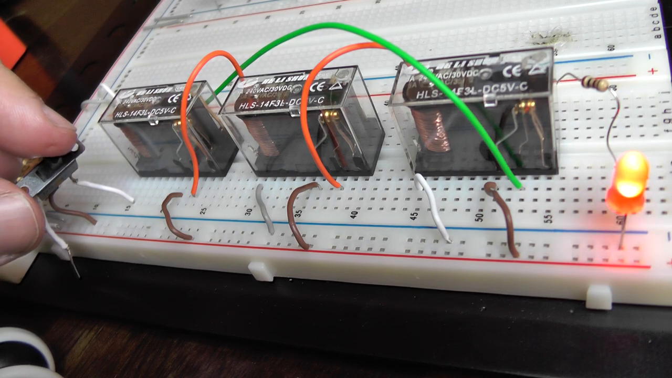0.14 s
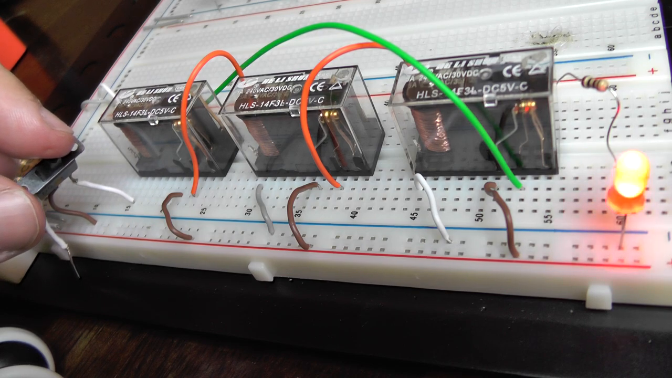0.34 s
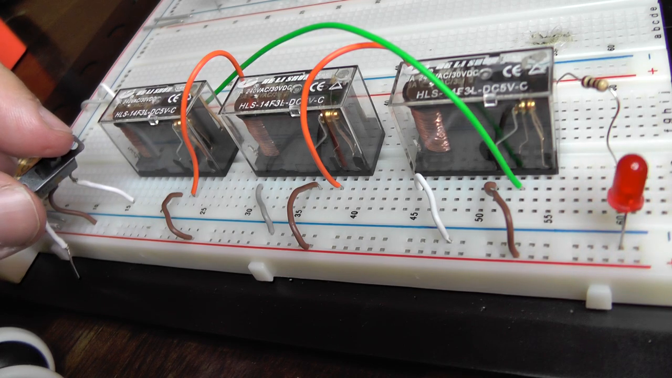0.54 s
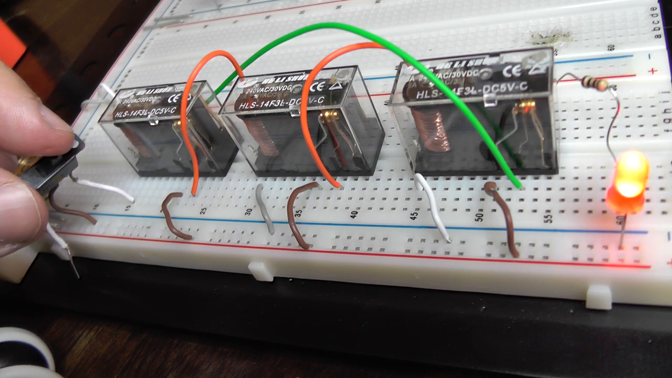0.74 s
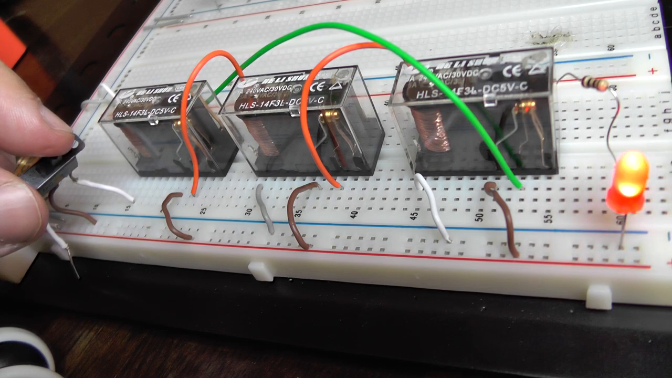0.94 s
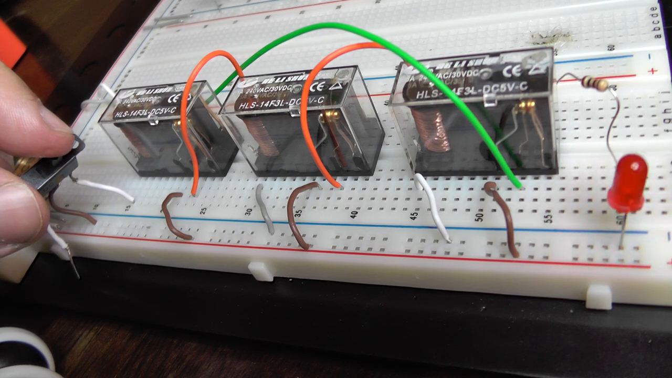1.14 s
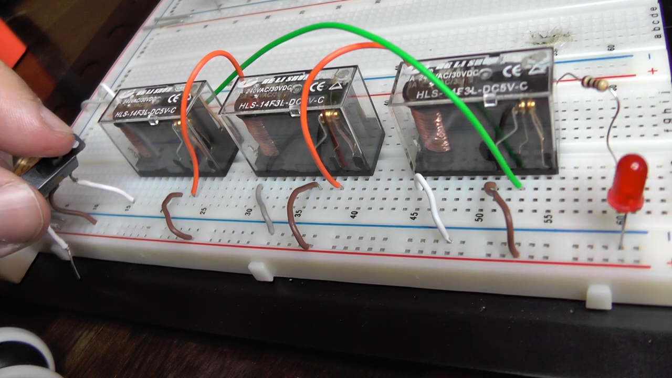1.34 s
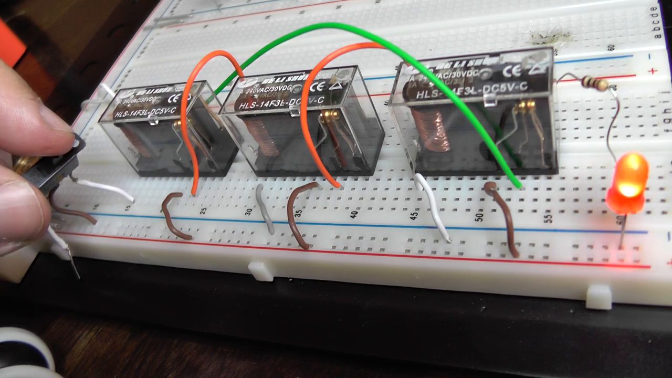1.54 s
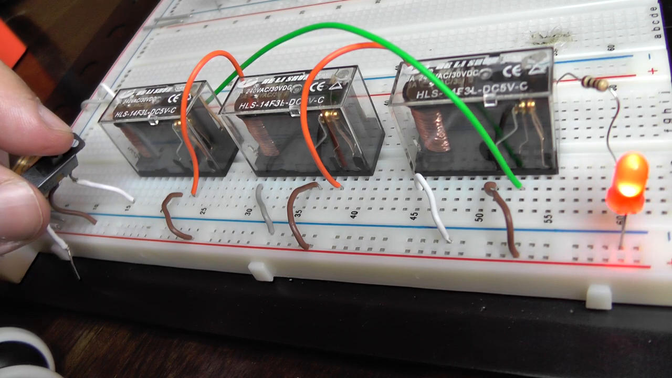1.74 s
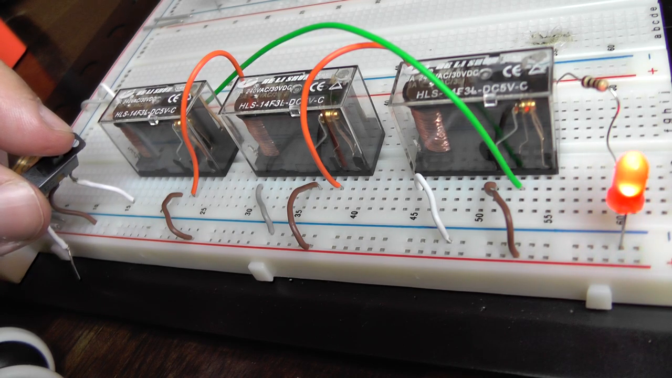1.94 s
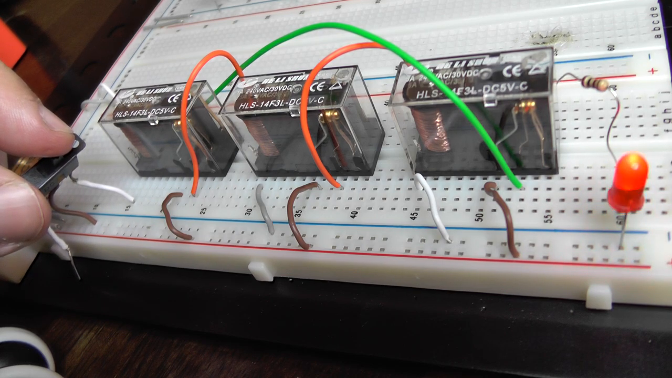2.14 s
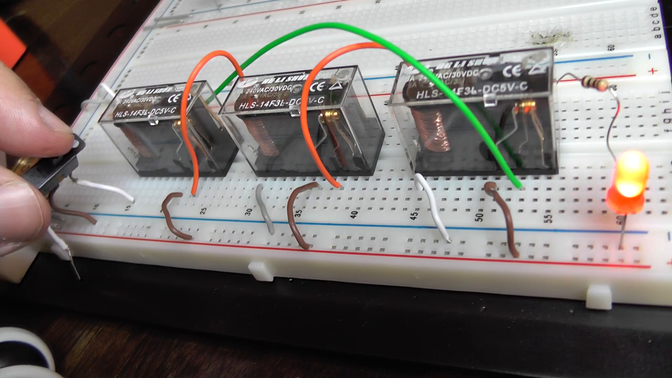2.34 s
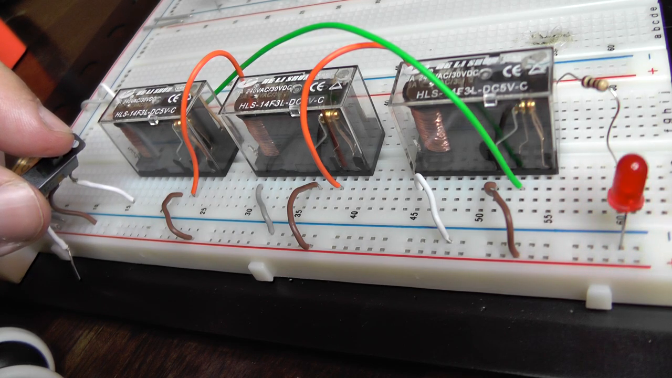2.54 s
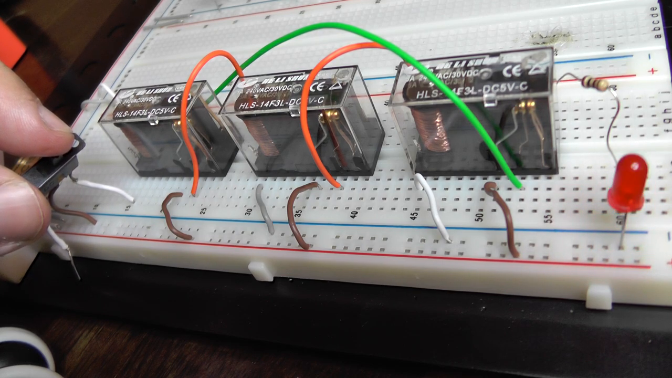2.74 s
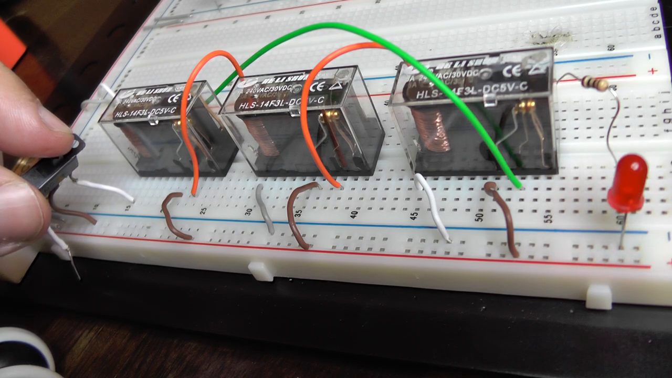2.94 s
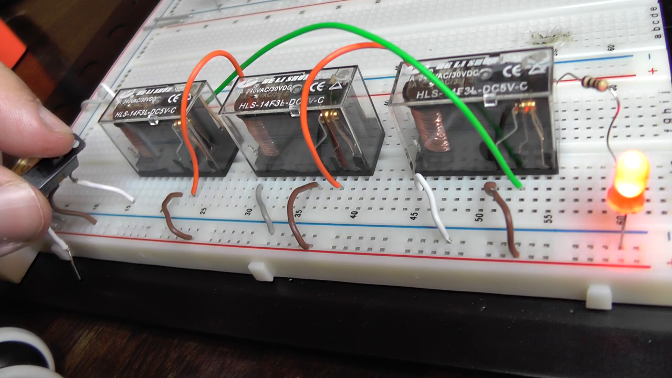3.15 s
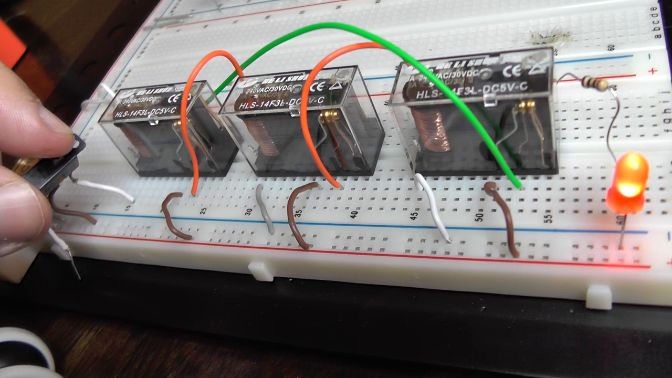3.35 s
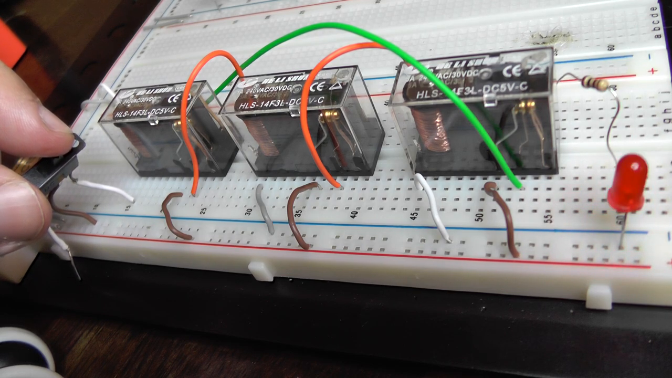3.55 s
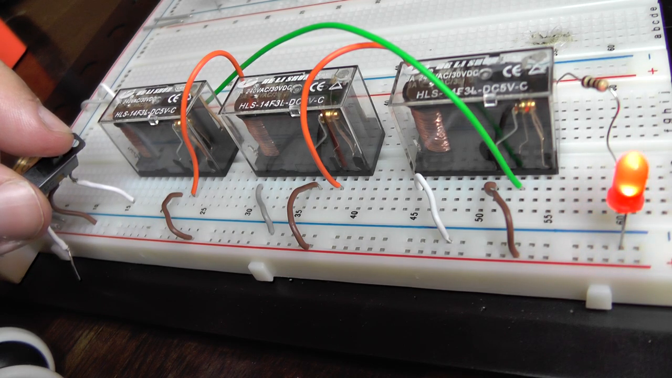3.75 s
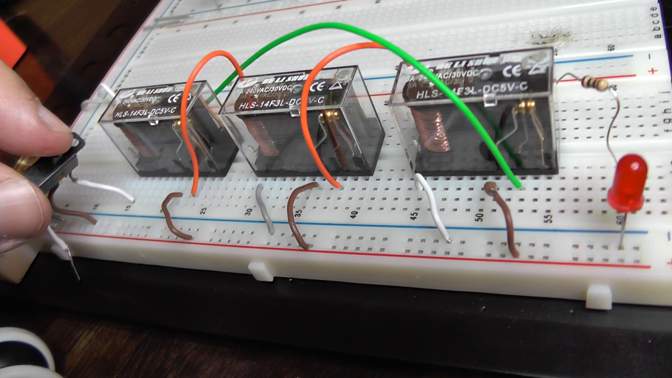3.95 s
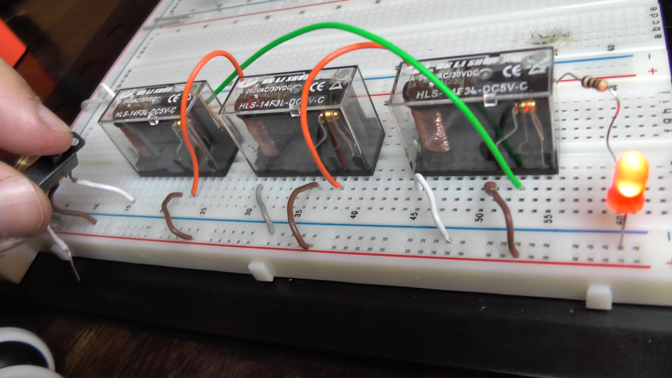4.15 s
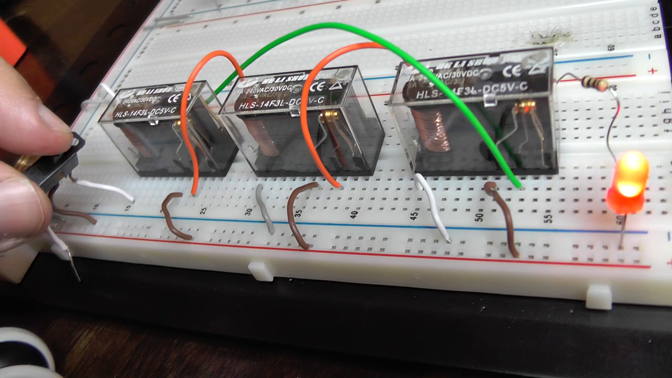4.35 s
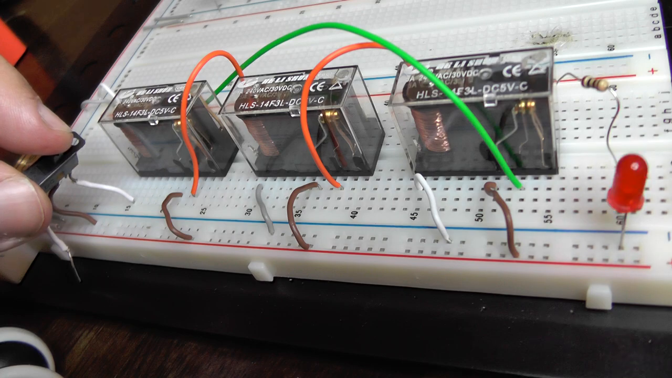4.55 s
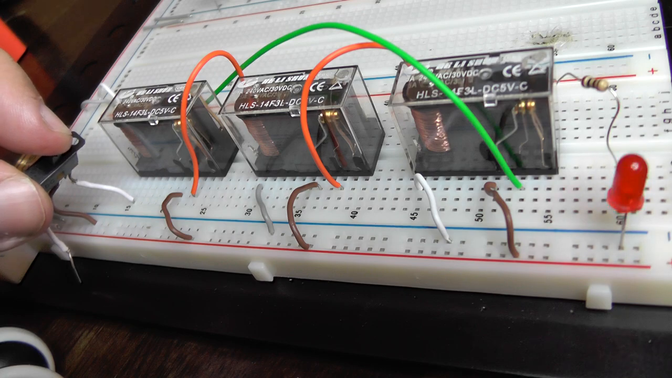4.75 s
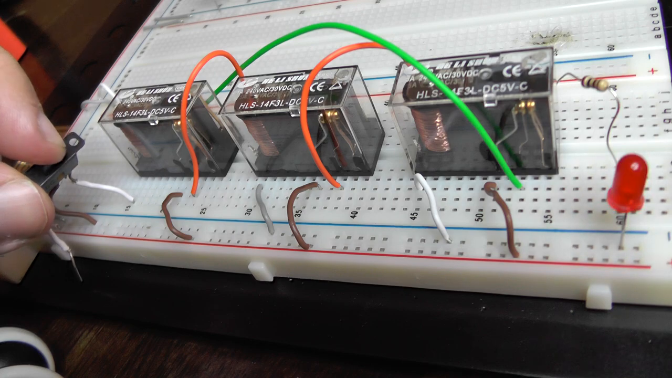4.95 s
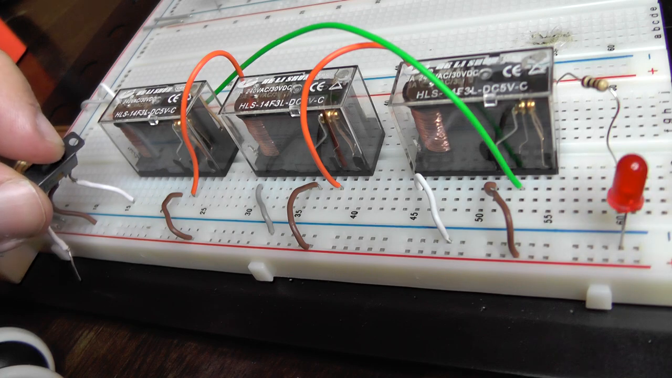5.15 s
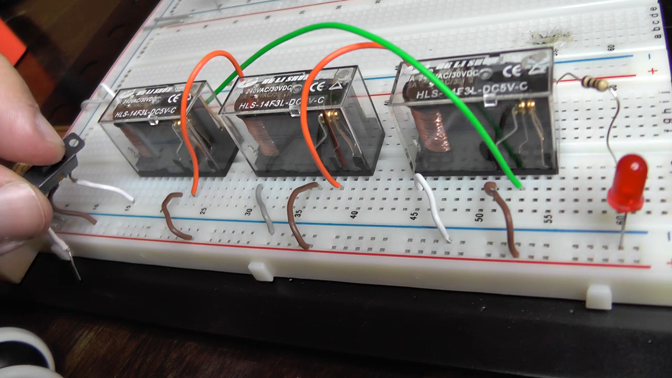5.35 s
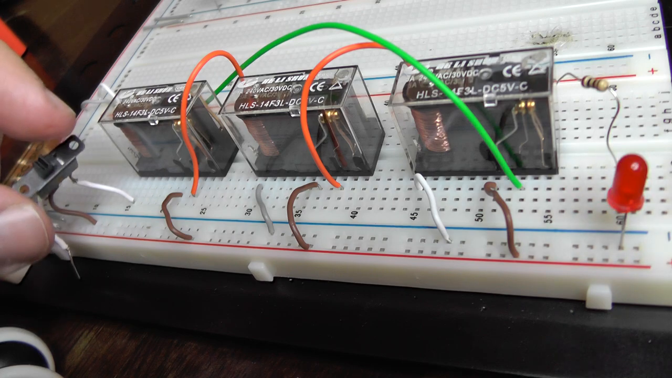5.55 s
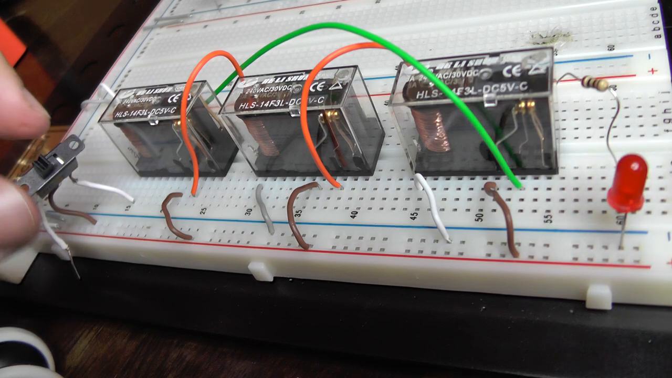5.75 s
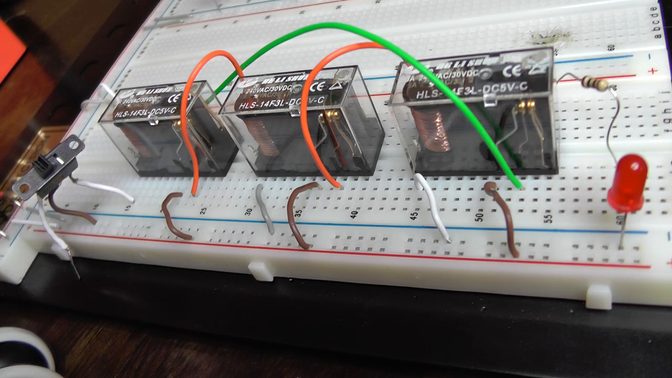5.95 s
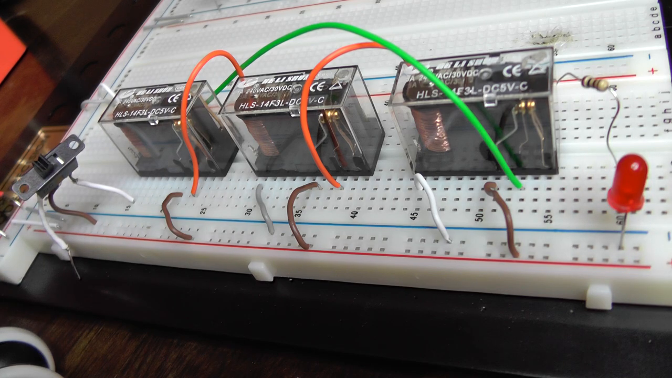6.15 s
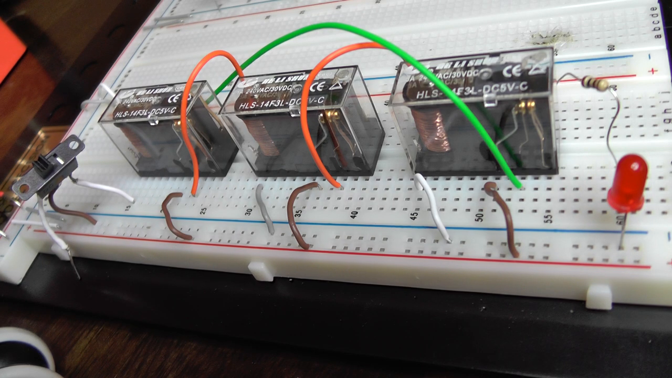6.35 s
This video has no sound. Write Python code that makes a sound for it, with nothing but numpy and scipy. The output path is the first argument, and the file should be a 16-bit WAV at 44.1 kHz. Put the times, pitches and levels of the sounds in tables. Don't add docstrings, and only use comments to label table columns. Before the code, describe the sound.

Three tiny relays chatter in a fast, bright, rattling buzz close up, stumbling slightly, then stop dead, leaving rising room hiss and one faint tap.

```python
import sys
import numpy as np
from scipy import signal
from scipy.fft import rfft, irfft, next_fast_len
from scipy.io import wavfile
from scipy.ndimage import uniform_filter1d

SR = 44100
rng = np.random.default_rng(int(sys.argv[2]) if len(sys.argv) > 2 else 0)


def log_audio(samples):
    frames = np.atleast_2d(samples).T
    limited = np.clip(frames, -1, 1)
    pcm = np.round(limited * 32767).astype(np.int16)
    wavfile.write(sys.argv[1], SR, pcm)


def ratio_of_db(decibels):
    return 10 ** (np.asarray(decibels, float) / 20)


N = 286650

ROUND_MS = 41.3


def read(points, hz):
    f, value = np.transpose(points)
    return np.interp(np.log(hz + 1), np.log(f + 1), value)


def coloured(x, points):
    size = next_fast_len(x.shape[-1])
    gain = ratio_of_db(read(points, np.fft.rfftfreq(size, 1 / SR)))
    return irfft(rfft(x, size) * gain, size)[..., :x.shape[-1]]


def ring(modes, size, rise):
    t = np.arange(size) / SR
    tones = np.zeros(size)
    for k, (hz, db, t60) in enumerate(modes):
        tones += (-1) ** k * ratio_of_db(db - 60 * t / t60) * np.sin(2 * np.pi * hz * t)
    return tones * (1 - np.exp(-t / rise))


def clicks(s, size):
    return np.bincount(np.clip(np.round(s * SR).astype(int), 0, N - 1), size, N)


def hum():
    # f/Hz, level/dB per Hz
    tone = [(18, -55), (30, -30), (60, -12), (261, -5), (674, -12.5), (950, -19), (1650, -19.5),
            (2270, -28), (3370, -25), (4270, -27.5), (11000, -39), (16400, -39)]
    # f/Hz, level/dB
    spread = [(60, -19), (180, -22), (550, -15), (1650, -21), (4970, -24), (15000, -17)]
    hz, t, z = signal.stft(rng.standard_normal((2, N)), SR, nperseg=1024)
    patches = uniform_filter1d(rng.standard_normal(z.shape[1:]), 8, 0)
    patches = uniform_filter1d(patches, 3, 1)
    patches = patches / np.sqrt(np.mean(patches ** 2) + 1e-20)
    z = z * ratio_of_db(read(tone, hz)[:, None] + 0.5 * patches * (hz < 2000)[:, None])
    mid, side = signal.istft(z, SR, nperseg=1024)[1][:, :N]
    return ratio_of_db(-51.5) / np.std(mid) * np.array([mid, coloured(side, spread)])


def far_tap():
    # t/s, level/dB, f/Hz, t60/s
    knock = [
        (6.061, -39, 680, 0.014),
    ]
    (s, db, hz, t60), = knock
    overtones = [(1, -5), (1.6, -2), (2.2, -5), (3.1, -8), (4.3, -8)]  # ratio, level/dB
    modes = [(ratio * hz, db + level_db, t60) for ratio, level_db in overtones]
    hit = clicks(np.array([s + .0015]), [1.])
    return signal.oaconvolve(hit, ring(modes, size=800, rise=.0003))[:N]


def room(x):
    # f/Hz, t60/s
    decay = [(500, 1), (1500, 0.47), (2600, 0.9), (4000, 0.71), (8000, 0.7), (10000, 0.57), (16000, 0.33)]
    # f/Hz, level/dB
    colour = [(400, 14), (1200, 12), (2500, -3.5), (4200, 7), (7500, 2.5), (10000, -5), (16000, 8.5)]
    hz, t, z = signal.stft(rng.standard_normal((3, 2, SR)), SR, nperseg=256)
    slow = ratio_of_db(read(colour, hz)[:, None] - 60 * t / read(decay, hz)[:, None])
    desk = ratio_of_db(8 - 60 * t / 0.04)
    tail = signal.istft(z * (slow + desk), SR, nperseg=256)[1]
    tail = tail * np.clip(np.arange(tail.shape[-1]) / SR / 0.0029, 0, 1)
    phase = np.arange(N) / SR * 9.1 + np.arange(3)[:, None] / 3
    turn = np.sqrt(2 / 3) * np.cos(2 * np.pi * phase)
    tail = tail / np.linalg.norm(tail[0, 0])
    wet = signal.fftconvolve((x * turn)[:, None], tail, axes=2)[..., :N].sum(0)
    return wet * ratio_of_db([[-9], [-19]])


def sideways(near):
    # f/Hz, level/dB
    spread = [(60, -5), (110, -2), (200, -32), (380, -8.5), (700, -6), (1290, -54.5), (2380, -17),
              (4400, -18.5), (8120, -13.5), (15000, -86)]
    smear = rng.standard_normal(200) * np.exp(-np.arange(200) / 60)
    return coloured(signal.oaconvolve(near, smear / np.linalg.norm(smear))[:N], spread)


def microphone(x):
    # f/Hz, level/dB
    response = [(20, -30), (150, -12), (300, 0), (15300, 0), (16500, 5)]
    return coloured(x, response)


def board(push):
    # f/Hz, level/dB, t60/s
    modes = [(314, -23, 0.11), (336, -30.5, 0.1), (384, -27.5, 0.11), (474.3, -25.5, 0.069),
             (676, -15.5, 0.017), (767, -7, 0.023), (851, -11.5, 0.039), (1139, -.5, 0.042),
             (1213.3, 0, 0.062), (1223.6, 3, 0.051), (1248, 3, 0.021), (1358, 2, 0.029),
             (1538, -5.5, 0.037), (1693, -7, 0.044), (2195, 7, 0.024), (2282, 5, 0.019),
             (2412, -0.5, 0.031)]
    return ratio_of_db(-14) * signal.oaconvolve(push, ring(modes, size=9000, rise=0.0011))[:N]


def rounds():
    # t/s, length/ms
    misses = [(0.4272, 38.1), (0.5047, 33.4), (0.5381, 61.8), (0.5999, 25.2), (0.6637, 38.3),
              (1.2901, 35.2), (1.4036, 35.3), (1.4793, 33.1), (1.5948, 38.4), (1.7155, 38.3),
              (1.8363, 37.2), (1.8735, 21.2), (2.5005, 23.4), (2.892, 38.3), (3.1703, 17.9), (3.2296, 29.4),
              (3.259, 29.3), (3.3669, 30.5), (3.7559, 20.5), (3.817, 38.8), (4.4997, 29.8)]
    # t/s, length/ms, second blow against normal level/dB
    slips = [(0.0294, 38.9, -3), (0.1095, 41.4, -3), (0.1925, 39.9, 0), (0.3482, 37.6, -4),
             (0.6251, 38.6, -5), (0.7826, 36.8, -5), (0.8591, 36.4, -3), (1.016, 36.8, 0),
             (1.0924, 38.0, 0), (1.2117, 37.5, -6), (1.8947, 41.2, -3), (1.9771, 37.2, 0),
             (2.0527, 37.9, 0), (2.3372, 41.9, 0), (2.4181, 41.2, -5), (2.7296, 39.4, 0),
             (2.8106, 40.2, -3), (3.0129, 38.2, 0), (3.0921, 37.2, 0), (3.2883, 40.7, 0),
             (3.3974, 39.7, -4), (3.4371, 42.7, 0), (3.6401, 36.5, -3), (3.6766, 39.3, -4),
             (3.7159, 40.0, -3), (3.8939, 38.4, -5), (4.3016, 38.4, 0), (4.5295, 36.9, -6),
             (4.5664, 42.1, 0), (4.6465, 39.5, -6)]
    running_s, cut_s = -.0115, 4.9318
    missed = [(s, ms, -np.inf) for s, ms in misses]
    odd = sorted([*slips, *missed, (cut_s, 0, 0)])
    rows, free = [], running_s
    for s, ms, loss_db in odd:
        count = round((s - free) * 1000 / ROUND_MS)
        for at in np.linspace(free, s, num=count, endpoint=False):
            rows.append((at, (s - free) * 1000 / count, 0))
        rows.append((s, ms, loss_db))
        free = s + ms / 1000
    return np.transpose(rows[:-1])


def blows():
    # t/s, level/dB
    strays = [
        (.5588, -21),
        (.5701, -20),
        (4.5217, -26),
    ]
    first_db, second_db, third_db, scatter_db = -18, -18.5, -19, 0.42
    second_after_ms, feeble_early_ms_per_db = 12.1, 0.26
    longest_lead_ms, least_lead_ms = 17.8, 15.8
    missed_db, feeble_shorter_ms_per_db = -7, 0.3
    hurry, hurry_loss_db_per_ms = .7, 0.67
    jitter_ms = .4
    shortest_ms = 30

    s, ms, loss_db = rounds()
    scatter = scatter_db * rng.standard_normal((3, len(s)))
    late = jitter_ms * rng.standard_normal((2, len(s))) / 1000
    natural_ms = ROUND_MS + feeble_shorter_ms_per_db * np.maximum(loss_db, missed_db)
    lead_ms = np.clip(longest_lead_ms - hurry * (natural_ms - ms), least_lead_ms, longest_lead_ms)

    first = np.transpose([s, first_db + scatter[0]])[s > 0]
    second_s = s + late[0] + (second_after_ms + feeble_early_ms_per_db * loss_db) / 1000
    second = np.transpose([second_s, second_db + loss_db + scatter[1]])[np.isfinite(loss_db)]
    third_s = s + late[1] + (ms - lead_ms) / 1000
    weak_db = hurry_loss_db_per_ms * (longest_lead_ms - lead_ms)
    third = np.transpose([third_s, third_db - weak_db + scatter[2]])[ms > shortest_ms]
    return first, np.concatenate([second, strays]), third


def chatter(first, second, third):
    first, every = first[:, 0], np.sort(np.concatenate([first, second, third])[:, 0])
    after = every[np.searchsorted(every, first) + 1]
    stalled = after - first > .015
    one = np.ones(stalled.sum())
    steps = clicks(first[stalled] + .006, one) - clicks(after[stalled] - .003, one)
    return ratio_of_db(-38) * uniform_filter1d(np.cumsum(steps), size=200)


def habit(bounces, shape):
    ms, level_db, _ = np.transpose(bounces)
    usual = clicks(ms / 1000, ratio_of_db(level_db))[:len(shape)]
    strength = np.hypot(np.linalg.norm(usual), np.linalg.norm(shape))
    rattle = shape * rng.standard_normal(len(shape))
    for _ in range(8):
        z = rfft(usual + rattle)
        rattle = irfft(z / abs(z), len(shape)) * strength - usual
        rattle = rattle * shape / np.sqrt(uniform_filter1d(rattle ** 2, size=40) + 1e-12)
    return rattle


def case(modes, crack_db, size):
    # f/Hz, level/dB
    tick = [(600, 6.5), (1200, -2.5), (3000, 11.5), (4800, 1.5), (7500, 10), (9700, 2.5), (12000, 9),
            (15200, -1), (16500, -3.5)]
    hz = abs(np.fft.fftfreq(size, 1 / SR))
    peaks = np.zeros(size)
    for f, db, t60 in modes:
        damping_hz = np.log(1000) / (2 * np.pi * t60)
        peaks += ratio_of_db(db) ** 2 / ((hz - f) ** 2 + damping_hz ** 2)
    power = peaks / peaks.mean() + ratio_of_db(crack_db + read(tick, hz)) ** 2
    click = np.fft.ifft(np.exp(np.conj(signal.hilbert(np.log(power) / 2)))).real
    half = size // 2
    lag = .0009 * np.interp(np.arange(half + 1), np.linspace(0, half, num=30), rng.random(size=30))
    click = irfft(rfft(click) * np.exp(-2j * np.pi * np.cumsum(lag) * SR / size), size)[:half]
    return click / np.linalg.norm(click)


def relay(hits, bounces, modes, rattle_db, rattle_t60, board_db, crack_db, trembling=0):
    # t/s, level/dB
    supply = [(0, -2.4), (.4, -1.5), (2.22, -0.26), (2.3, -2.5), (2.55, -1), (3.75, .5), (3.85, -1),
              (4.45, -0.8), (4.6, 0.5), (4.93, -1)]
    # f/Hz, level/dB
    fresh_share = [(1500, -7.5), (3500, -6.5), (6500, -6), (12000, -8)]
    s, db = np.transpose(hits)
    db = db + np.interp(s, *np.transpose(supply))
    chance = rng.standard_normal((len(s), len(bounces), 2))
    drive = np.zeros(N)
    for k, (ms, level_db, scatter_ms) in enumerate(bounces):
        at = s - .0004 + (ms + scatter_ms * chance[:, k, 0]) / 1000
        drive += clicks(at, ratio_of_db(db + level_db + 0.86 * chance[:, k, 1]))

    t = np.arange(1200) / SR
    shape = ratio_of_db(rattle_db - 60 * t / rattle_t60) * (1 - np.exp(-t / 0.0006))
    grit = rng.standard_normal(N) * (rng.random(N) < 9000 / SR)
    struck = clicks(s - .0004, ratio_of_db(db))
    same = signal.oaconvolve(struck, habit(bounces, shape * np.std(grit)))[:N]
    fresh = signal.oaconvolve(struck, shape)[:N] * grit
    same_share = [(hz, 10 * np.log10(1 - ratio_of_db(share_db) ** 2)) for hz, share_db in fresh_share]
    drive = drive + coloured(same, same_share) + coloured(fresh, fresh_share) + trembling * grit

    push = clicks(s + 0.00055, ratio_of_db(db + board_db + 1.1 * chance[:, 0, 1]))
    return signal.oaconvolve(drive, case(modes, crack_db, size=4096))[:N], push


def first_relay(hits):
    # f/Hz, level/dB, t60/s
    modes = [(2280, -6, 0.027), (2930, 3, 0.009), (3450, 4, 0.012), (3790, 4, 0.01), (4310, -2, 0.014),
             (4870, -7, 0.012), (5450, -6, 0.014), (5940, -1, 0.009), (7260, -5, 0.02), (8120, -6, 0.026),
             (9190, 2, 0.007), (9910, -2, 0.007), (10640, -1, 0.007), (11930, 0, 0.01), (13610, -5, 0.01),
             (14510, -5, 0.01), (15590, -14, 0.016)]
    # delay/ms, level/dB, timing scatter/ms
    bounces = [(.2, -9, .05), (.8, 3, .01), (1.5, -6, .04), (2.2, -8, .06), (3.3, -5, .06), (6.3, -11, .3)]
    return relay(hits, bounces, modes, rattle_db=-6.5, rattle_t60=0.0297, board_db=-9.5, crack_db=-4.1)


def second_relay(hits, trembling):
    # f/Hz, level/dB, t60/s
    modes = [(1890, -6, 0.018), (2330, -1, 0.02), (3640, -2, 0.011), (4030, -8, 0.021), (4440, -8, 0.016),
             (5210, -4, 0.012), (5730, -14, 0.023), (7130, 2, 0.011), (7620, -5, 0.016), (8070, 0, 0.01),
             (9300, -2, 0.009), (10030, -8, 0.01), (10620, -4, 0.011), (12490, 3, 0.006),
             (13010, -9, 0.012), (13540, -4, 0.009), (14900, 0, 0.007)]
    # delay/ms, level/dB, timing scatter/ms
    bounces = [(.2, -5, .05), (.7, 0, .02), (1.1, -3, .04), (1.8, -3, .07), (2.5, -7, .1), (3.2, -7, .15)]
    return relay(hits, bounces, modes, rattle_db=-5, rattle_t60=0.033, board_db=-12.5, crack_db=-10.5,
                 trembling=trembling)


def third_relay(hits):
    # f/Hz, level/dB, t60/s
    modes = [(2200, -4, 0.027), (2760, -2, 0.013), (3320, -6, 0.027), (3770, -11, 0.027),
             (4330, -13, 0.027), (5120, -11, 0.019), (5510, -6, 0.013), (6610, -7, 0.027),
             (7450, -15, 0.026), (7950, 1, 0.017), (8630, -6, 0.019), (8890, -5, 0.013), (10550, -3, 0.018),
             (11410, 2, 0.007), (12960, -3, 0.011), (14490, -7, 0.012), (15570, -7, 0.009)]
    # delay/ms, level/dB, timing scatter/ms
    bounces = [(0, -5, .06), (.7, -3, .06), (1.5, -4, .1), (2.2, -5, .1), (2.8, -3, .12), (3.8, -6, .2),
               (5, -6, .3)]
    return relay(hits, bounces, modes, rattle_db=-7.5, rattle_t60=0.042, board_db=-11, crack_db=-6.5)


def scene():
    first, second, third = blows()
    trembling = chatter(first, second, third)
    cases, push = np.sum([first_relay(first), second_relay(second, trembling), third_relay(third)], axis=0)
    no_bass = signal.butter(4, 1500, "high", fs=SR, output="sos")
    cases = signal.sosfilt(no_bass, cases)
    near = microphone(ratio_of_db(24.5) * (cases + board(push)))
    wet_mid, wet_side = room(near)
    mid = near + wet_mid + far_tap()
    side = sideways(near) + wet_side
    mid, side = np.array([mid, side]) + hum()
    return np.array([mid + side, mid - side])


def roll_off(x):
    return signal.sosfilt(signal.butter(12, 17780, fs=SR, output="sos"), x)


def record(dry):
    # t/s, level/dB
    gain = [(0, -10), (4.94, -12), (5.1, -12), (5.25, -5), (5.4, -3.5), (5.6, 0.5), (5.8, 3.3), (6.1, 3.2),
            (6.5, 3.5)]
    x = dry * ratio_of_db(np.interp(np.arange(N) / SR, *np.transpose(gain)))
    x = 0.41 * np.tanh(x / 0.38)
    x = x - np.array([[1.1], [.5]]) * np.maximum(x - .09, 0) ** 2
    x = x + ratio_of_db(-76) * rng.standard_normal(N)
    band_limit = signal.firwin(801, 16520, window=("kaiser", 4.5), fs=SR)
    x = signal.oaconvolve(x, band_limit[None], "same")
    return roll_off(x)


dry = scene()
out = record(dry)
log_audio(out)
```